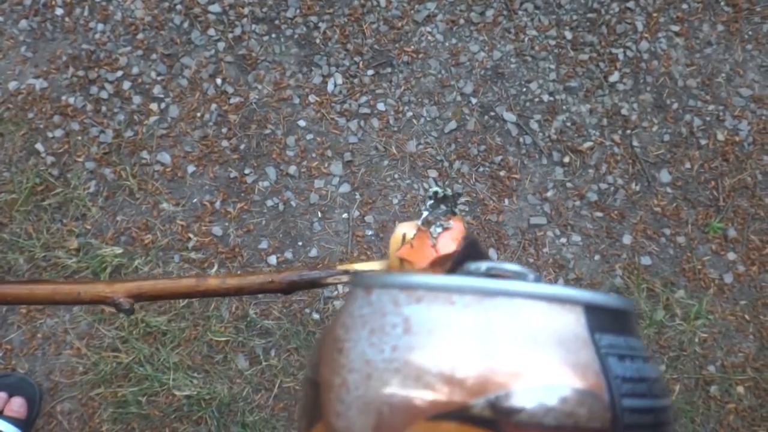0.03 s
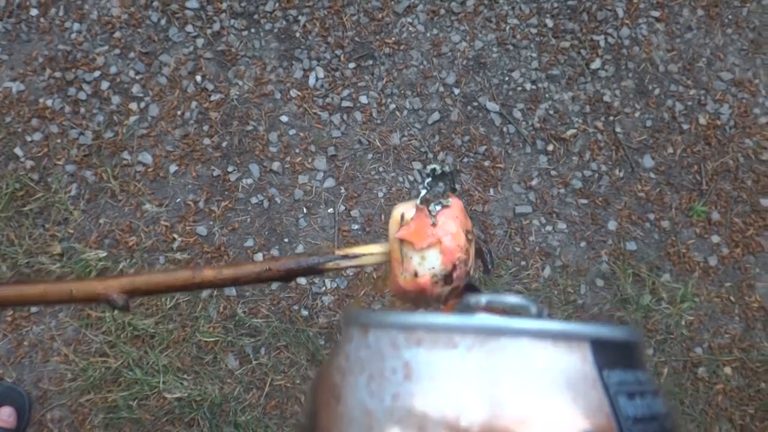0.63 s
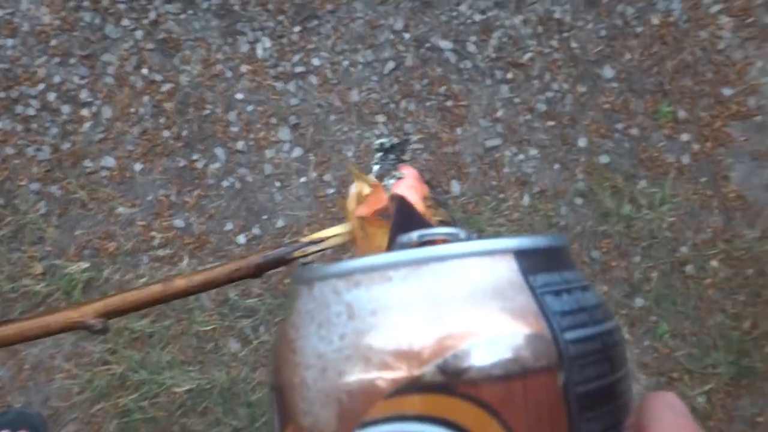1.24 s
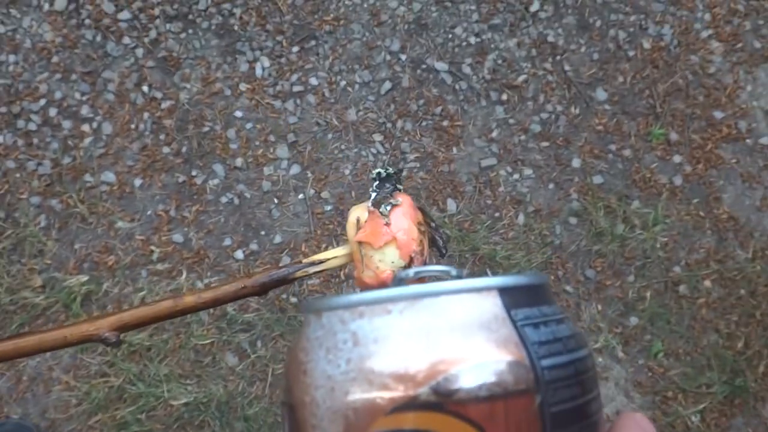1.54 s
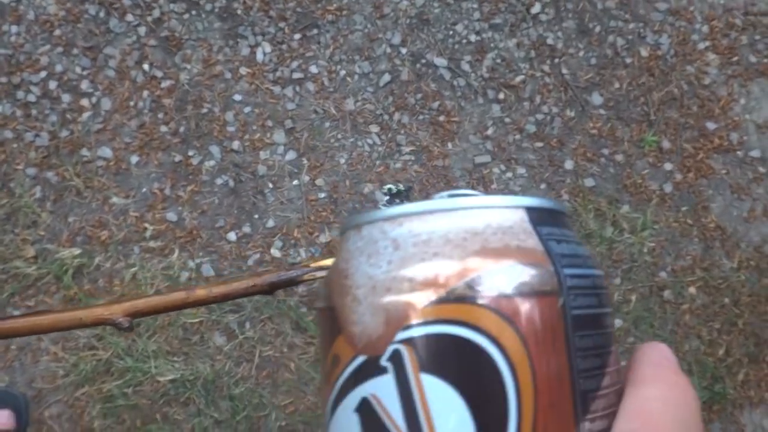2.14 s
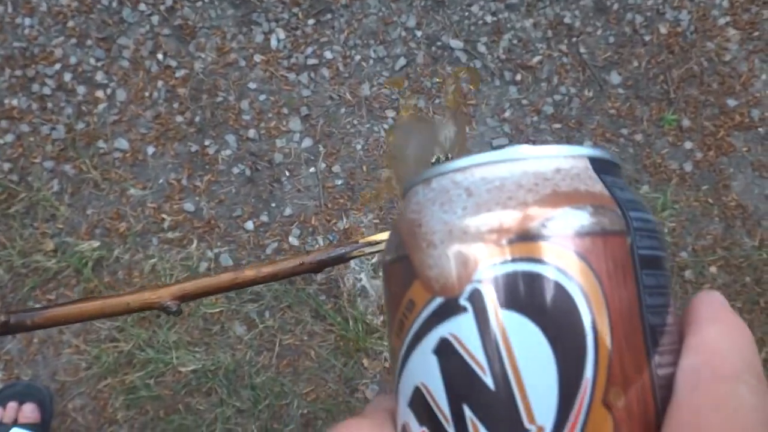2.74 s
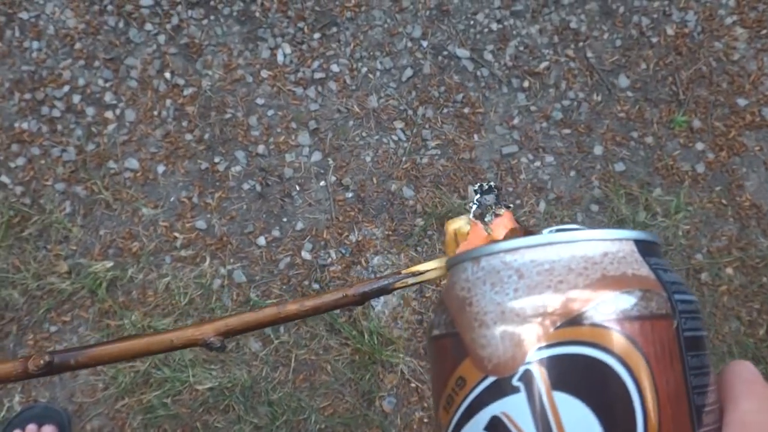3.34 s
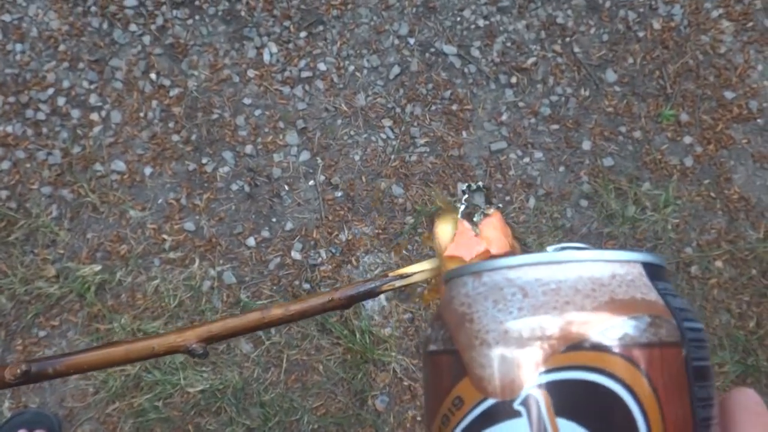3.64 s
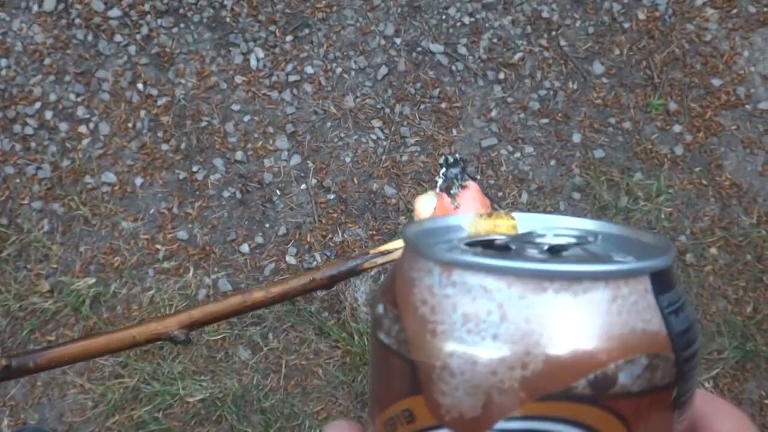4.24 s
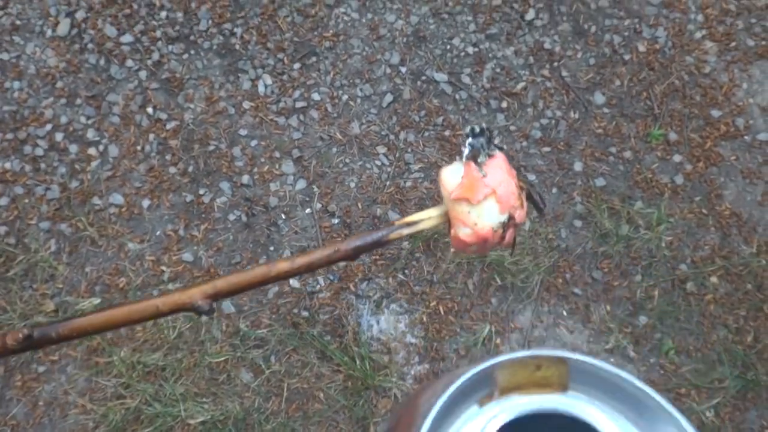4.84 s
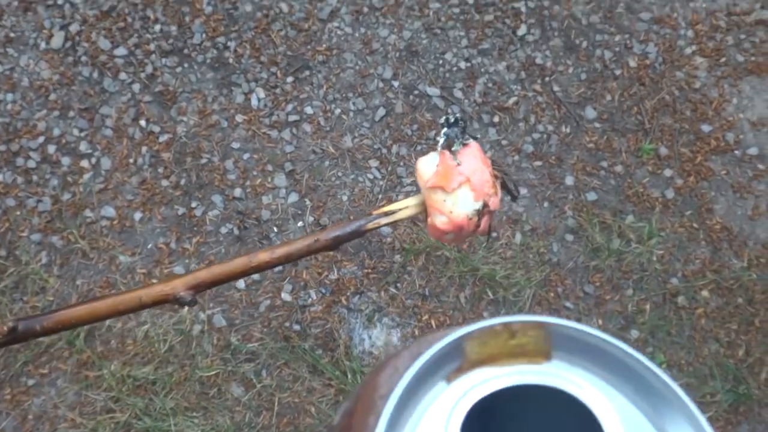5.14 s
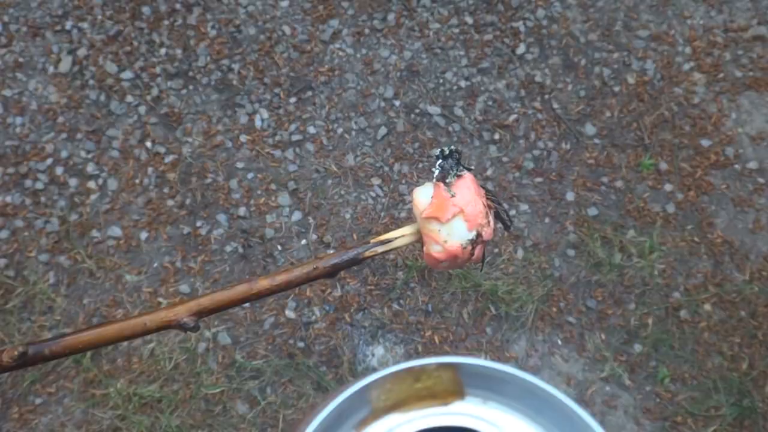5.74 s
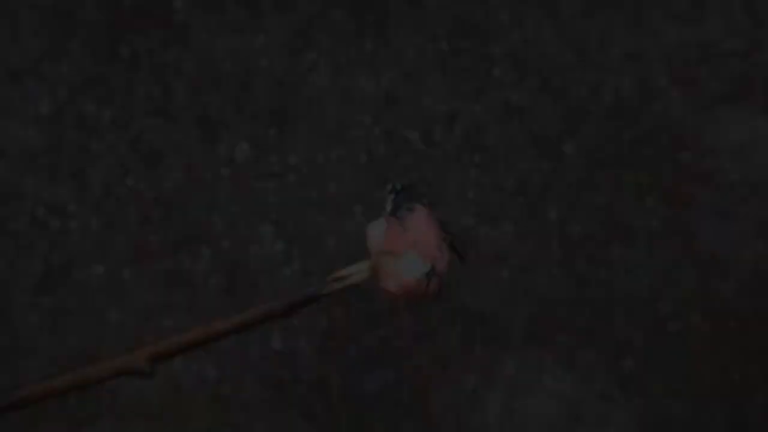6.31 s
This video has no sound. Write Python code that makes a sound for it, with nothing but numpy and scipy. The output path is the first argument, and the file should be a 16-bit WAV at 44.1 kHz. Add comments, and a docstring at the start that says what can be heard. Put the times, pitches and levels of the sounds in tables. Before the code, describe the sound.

Soda is tipped from a can over a stick in several short pours, and crisp drops spatter on gravel close to the microphone. The puddle fizzes finely while the can softly sloshes and glugs. Near the end its dented wall clicks sharply and fingers bump it. The drips stop and the fizz fades. A small bird and a distant animal call faintly over a quiet outdoor rumble.

```python
"""Crisp drops spatter on gravel as soda is tipped from a can over a stick in short pours.
Tiny bursting bubbles make the puddle fizz and slowly fade, over a quiet outdoor rumble and a low hum.
A small bird whistles and some animal cries far off. The soda sloshes as the can moves and glugs
as air gulps in. Near the end the can's dented wall clicks back and fingers bump against it."""
import sys
import numpy as np
from scipy import signal
from scipy.fft import rfft, irfft, next_fast_len
from scipy.io import wavfile
from scipy.ndimage import uniform_filter1d, map_coordinates

SR = 44100
rng = np.random.default_rng(int(sys.argv[2]) if len(sys.argv) > 2 else 0)


def wrap_up_sound(samples):
    """Save the sound to the file named by the first command line argument, as 16-bit audio."""
    columns = np.atleast_2d(samples).T
    # keep every value between -1 and 1, then stretch to whole-number steps
    tamed = np.clip(columns, -1, 1)
    steps = np.round(tamed * 32767).astype(np.int16)
    wavfile.write(sys.argv[1], SR, steps)


N = 289737


def amp(db):
    """Turn decibels into a multiplier."""
    return 10 ** (np.asarray(db) / 20)


def unit(x):
    """Scale a sound to an average (rms) level of 1."""
    return x / np.sqrt(np.mean(x ** 2) + 1e-20)


def along(points, hz):
    """Read between (f/Hz, value) points, with octaves evenly spaced."""
    f, v = np.transpose(points)
    return np.interp(np.log(hz + 1), np.log(f + 1), v)


def curve(rows):
    """Join (t/s, value) points into one value per sample."""
    return np.interp(np.arange(N) / SR, *np.transpose(rows))


def wobble(rate):
    """A smooth curve through `rate` random values a second."""
    return map_coordinates(rng.standard_normal(int(N * rate / SR) + 4), [np.arange(N) * rate / SR])


def filtered(x, response):
    """Multiply each frequency in x by response(hz)."""
    m = next_fast_len(N + SR // 2)
    return irfft(rfft(x, m) * response(np.fft.rfftfreq(m, 1 / SR)), m)[..., :N]


def ring(x, gain_db):
    """Shape the tone of x so that it rings only after a hit (a minimum-phase filter)."""
    cepstrum = irfft(gain_db * np.log(10) / 20)
    half = cepstrum.shape[-1] // 2
    fold = np.r_[1, np.full(half - 1, 2), 1, np.zeros(half - 1)]
    return irfft(rfft(x) * np.exp(rfft(cepstrum * fold)))


def add(track, s, sound):
    """Mix a sound into a track at s seconds."""
    start = max(round(s * SR), 0)
    part = track[..., start:start + sound.shape[-1]]
    part += sound[..., :part.shape[-1]]


def pops(rate, spread_db):
    """Tiny clicks of random size, about `rate` a second."""
    clicks = (rng.random(N) < rate / SR) * rng.standard_normal(N)
    return unit(clicks * amp(spread_db * np.clip(rng.standard_normal(N), -2, 2)))


def widen(mid, side):
    """Make left and right by adding and subtracting `side`."""
    return np.array([mid + side, mid - side])


def outdoor_echo(x, fade_s):
    """A blurred echo, different at each ear, that falls 60 dB in fade_s."""
    t = np.arange(SR) / SR
    tail = rng.standard_normal((2, SR)) * amp(-60 * t / fade_s)
    return signal.fftconvolve(np.atleast_2d(x), tail / np.linalg.norm(tail[0]), axes=1)[:, :N]


# each tip of the can: start t/s, end t/s, level/dB
POURS = [(0, 0.117, -35.5), (0.272, 0.475, -36), (0.633, 0.943, -34.5), (1.048, 1.436, -36.5),
         (1.665, 2.013, -35), (2.14, 2.421, -40), (3.073, 3.17, -36.5), (3.52, 4.222, -36),
         (4.69, 4.724, -38)]
def flow(s, rise_db_per_s=78, fall_db_per_s=75, dribble_db=-43, hold_s=0.23, fade_db_per_s=19):
    """The stream's level in dB at times s: it builds, holds and stops, and the wet stick dribbles on."""
    start, end, db = np.transpose(POURS)[:, :, None]
    early, late = np.maximum(start - s, 0), np.maximum(s - end, 0)
    dribble = dribble_db - fade_db_per_s * np.maximum(late - hold_s, 0)
    return (np.maximum(db - fall_db_per_s * late, dribble) - rise_db_per_s * early).max(0)


def shower(tries, over_flow_db, spread_db, bright, bright_spread, full_flow_db, thinning):
    """Pick random drops for splats(): many in a full stream, fewer and softer as it weakens."""
    delay, chance = rng.random((tries, 2)).T
    size, tone = np.clip(rng.standard_normal((tries, 2)), -2, 1.5).T
    s = (np.arange(tries) + 2 * delay) / (tries + 2) * N / SR
    flow_db = flow(s)
    falls = chance < amp(thinning * (flow_db - full_flow_db))
    db = flow_db + over_flow_db + spread_db * size
    return np.column_stack([s, db, bright + bright_spread * tone])[falls]


# the tone of the splats, as coloured by the microphone: f/Hz, level/dB
SPLAT_TONE = [(300, -29.5), (900, -32), (1700, -35.5), (2700, -25.5), (3500, -26.5), (4350, -16),
              (5600, -13), (7900, -2), (9000, 3), (10300, -9), (11800, -22.5), (13600, -8), (15500, -8.5),
              (16600, -47)]
def splats(rows, slap=4.6, ragged_s=0.00061, scatter_db=-9, patter_db=-22):
    """Each drop bursts on a stone with its own pitch, throws droplets about and gets one short echo."""
    size, lead_s = 2048, 0.002
    burst_s, scatter_s, patter_s = 0.00026, 0.0028, 0.0057  # fade times
    echo_s, echo_db = 0.0053, -16
    age, hz = np.arange(size) / SR - lead_s, np.fft.rfftfreq(size, 1 / SR)
    before, after = np.minimum(age, 0), np.maximum(age, 0)
    s, db, bright = np.transpose(rows)[:, :, None]
    length, wetness, path, pitch = np.clip(rng.standard_normal((len(rows), 4)), -1.5, 1.5).T[:, :, None]
    burst = np.exp(2 * before / burst_s - after / (burst_s * amp(3.8 * length)))
    force = burst * rng.standard_normal((len(rows), size))
    force[:, round(lead_s * SR)] += slap
    # a ragged drop starts to land a little before its bulk arrives
    onset = np.exp(before / (ragged_s * amp(4.2 * wetness)))
    droplets = amp(scatter_db) * np.exp(-after / scatter_s) + amp(patter_db) * np.exp(-after / patter_s)
    patter = onset * droplets * amp(2 * wetness) * rng.standard_normal((len(rows), size))
    octaves = np.log2(np.clip(hz, 500, 15000) / 8500)
    tilt = bright * octaves * np.exp(-(octaves / 2.4) ** 2)  # brightness tilts the treble
    air_pocket = 8 * np.exp(-((octaves - 0.53 * (pitch - 1)) / 0.14) ** 2)  # trapped air rings
    tone = along(SPLAT_TONE, hz)
    hits = ring(force, tone + tilt + air_pocket / 2) + ring(patter, tone + tilt / 2 + air_pocket)
    loudest = np.sqrt(uniform_filter1d(hits ** 2, size=88, axis=1).max(1, keepdims=True))
    hits *= amp(db) / loudest
    echo = amp(echo_db) * np.exp(-2j * np.pi * hz * echo_s * (1 + path / 10))
    hits = irfft(rfft(hits) * (1 + echo))
    out = np.zeros(N)
    for when, hit in zip(s[:, 0], hits):
        add(out, when - lead_s, hit)
    return out


# the heaviest drops: t/s, level/dB, brightness/(dB per octave)
HEAVY_DROPS = [(.0279, -19, 0), (.0535, -19.5, -9), (.0659, -18, 11), (.1262, -16, -7), (.3019, -21, -7),
               (.3344, -19.5, 11), (.3985, -17.5, 8), (.4527, -17.5, -9), (.5654, -18.5, -3),
               (.6675, -25.5, 7), (.7714, -22, -6), (.8956, -18, -4), (.9188, -17, 5), (1.0715, -27.5, -16),
               (1.1433, -15, -1), (1.1924, -19, 8), (1.2853, -20, -3), (1.3556, -19.5, 0),
               (1.4064, -16, 24), (1.6983, -18.5, 1), (1.7955, -19.5, -2), (1.8769, -17, 7),
               (1.9778, -15.5, 4), (2.0621, -22, -7), (2.3524, -20.5, 17), (2.3632, -19.5, 10),
               (2.3946, -22.5, 4), (2.41, -21.5, -3), (2.4826, -21, -1.5), (2.5266, -18.5, 5.5),
               (2.6343, -18, -7), (2.6686, -23, -6), (2.7508, -25, -4.5), (3.0661, -27.5, 14),
               (3.0821, -22, 33), (3.1829, -22, 4), (3.4584, -22, 7), (3.4724, -23.5, -1),
               (3.5149, -22, 0.5), (3.6221, -19, 14), (3.692, -20, 1), (3.7517, -19, -9.5),
               (3.7811, -16, 1), (3.8804, -20, -3.5), (3.967, -18, 2.5), (4.0255, -18.5, 2.5),
               (4.0662, -21, -4), (4.1024, -21, -6), (4.2049, -20, 10), (4.2091, -17, 8), (4.2433, -19, -1),
               (4.2723, -18.5, -2.5), (4.3388, -21.5, -11), (4.4007, -18.5, -0.5), (4.4102, -21, -3),
               (4.4394, -23.5, 0), (4.5981, -20, 0.5), (4.6442, -17.5, -2), (4.7012, -16.5, -8),
               (4.9183, -31, 11), (5.2177, -35, 1)]
def spatter(wander_db=0.52, echo_db=-20):
    """The stream lands as heavy drops, middling beads and fine spray, a little to either side."""
    beads = shower(tries=205, over_flow_db=11.5, spread_db=1.4, bright=1.5, bright_spread=5.4,
                   full_flow_db=-37.5, thinning=1.4)
    spray = shower(tries=1250, over_flow_db=0.5, spread_db=4.5, bright=-1.5, bright_spread=3.5,
                   full_flow_db=-35, thinning=1.1)
    heavy = splats(HEAVY_DROPS, slap=4.8, ragged_s=0.00048, scatter_db=-9.5, patter_db=-22.5)
    drops = heavy + splats(beads) + splats(spray)
    # each ear hears a slightly different tone
    width = [(1000, -3.5), (4000, -14.0), (9000, -16.5), (13000, -30)]  # f/Hz, level/dB
    side = filtered(drops, lambda hz: 1j * amp(along(width, hz)) * np.sin(2 * np.pi * hz * 0.000414))
    wander = amp(widen(0, wander_db * wobble(60)))
    return widen(drops, side) * wander + amp(echo_db) * outdoor_echo(drops, fade_s=0.068)


# the tone of the fizz, as coloured by the microphone: f/Hz, level/dB
FOAM_TONE = [(1500, -32.5), (3700, -22), (4400, -16.5), (5200, -16), (7400, -9), (8400, -6.5), (9250, 1),
             (10300, -17), (11900, -23.5), (14200, -15), (15600, -16), (16000, -61)]
def foam(side_db=-15):
    """Countless tiny bubbles burst in a fine hiss that slowly fades."""
    fade = [(0, -42.5), (2, -44), (2.9, -45), (4.2, -45.5), (5.5, -49.5), (6.55, -51)]  # t/s, level/dB
    bubbles = widen(pops(rate=24000, spread_db=3), amp(side_db) * rng.standard_normal(N))
    hiss = unit(filtered(bubbles, lambda hz: amp(along(FOAM_TONE, hz))))
    return amp(curve(fade) + wobble(23.195) / 2) * hiss


# the tone of the outdoor air: f/Hz, level/dB
AIR_TONE = [(15, -38), (25, -3), (118, 0.5), (164, -4.5), (210, -4), (360, -12.5), (1120, -10.5),
            (1440, -17), (1700, -25.5), (2180, -22), (3090, -12.5), (3500, -20), (4550, -107), (7700, -120)]
# how alike it is at both ears: f/Hz, likeness (1 = the same)
AIR_LIKENESS = [(60, 0.87), (130, 0.98), (260, 0.22), (800, 0.012), (3000, 0.52)]
def rumble(level_db=-59):
    """A distant, gently wavering rumble."""
    def mid_and_side(hz):
        angle = np.arccos(np.clip(along(AIR_LIKENESS, hz), -1, 1)) / 2
        return amp(along(AIR_TONE, hz)) * [np.cos(angle), np.sin(angle)]
    air = unit(widen(*filtered(rng.standard_normal((2, N)), mid_and_side)))
    return amp(level_db + wobble(2.2) / 2) * air


# the notes in the hum: f/Hz, relative level/dB
HUM_NOTES = [(59, -75.5), (79, -65), (120, -66), (203, -72)]
def hum(gain_db=-1):
    """Low, unsteady notes swell and fade together."""
    t = np.arange(N) / SR
    swell = [(0, -2), (.8, 2), (4.8, 1), (6.55, -5)]  # t/s, level/dB
    notes = sum(amp(db + 1.86 * wobble(6.5)) * np.sin(2 * np.pi * hz * t + 1.36 * wobble(9))
                for hz, db in HUM_NOTES)
    return amp(gain_db + curve(swell)) * np.sqrt(2) * notes


def calls(rows, warble_hz, depth, rough, arch):
    """Sliding whistled notes with a warble and a shaky pitch."""
    out = np.zeros(N)
    for s, length, start_hz, end_hz, db in rows:
        t = np.arange(int(length * SR)) / SR
        swell = np.abs(np.sin(np.pi * t / length))
        bend = depth * np.sin(2 * np.pi * warble_hz * t) + arch * (swell - .5)
        jitter = np.interp(t, np.linspace(0, 1, 300), rng.standard_normal(300))
        pitch = (start_hz + (end_hz - start_hz) * t / length) * (1 + bend + rough * jitter)
        add(out, s, amp(db) * unit(np.sqrt(swell) * np.sin(2 * np.pi * np.cumsum(pitch) / SR)))
    return out


# the bird's notes: t/s, length/s, start f/Hz, end f/Hz, relative level/dB
BIRD_NOTES = [(.13, 0.12, 3070, 2676, -55.5), (.6, 0.089, 2770, 2570, -59), (3.62, 0.1, 2800, 2410, -60),
              (4.24, 0.2, 2880, 2530, -56), (4.87, 0.11, 3093, 2800, -57.5), (5.34, 0.066, 2850, 2880, -59),
              (5.4, 0.19, 2600, 2510, -64), (5.79, 0.26, 2750, 2540, -66)]
def bird(direct_db=-6, echo_db=-1.5):
    """A small bird whistles short, mostly falling notes, blurred by the surroundings."""
    song = calls(BIRD_NOTES, warble_hz=33.1, depth=0.028, rough=0.037, arch=0.009)
    return amp(direct_db) * song + amp(echo_db) * outdoor_echo(song, fade_s=0.49)


# the animal's cries: t/s, length/s, start f/Hz, end f/Hz, relative level/dB
ANIMAL_CRIES = [(.22, 0.21, 970, 910, -61.5), (.26, 0.35, 1442, 1555, -58.5), (1.02, 0.3, 965, 902, -61.5),
                (1.8, 0.36, 956, 895, -59), (2.17, 0.27, 967, 976, -59.5), (2.2, 0.29, 1475, 1530, -67),
                (5.72, 0.253, 962, 918, -60)]
def far_animal(direct_db=-6, echo_db=-7):
    """Lower, drawn-out cries echo from far away."""
    cries = calls(ANIMAL_CRIES, warble_hz=45.1, depth=0.022, rough=0.0317, arch=0.0244)
    return amp(direct_db) * cries + amp(echo_db) * outdoor_echo(cries, fade_s=0.49)


# soda surging in the can: t/s, relative level/dB
SURGES = [(.3, -76), (.68, -58), (.94, -55.5), (1.46, -51), (1.75, -54), (2.4, -55.5), (3.02, -63),
          (3.5, -56.5), (3.95, -58.5), (4.27, -58), (4.49, -58.5)]
def slosh(gain_db=-1, rise_s=0.058, settle_s=0.33):
    """Whenever the can moves, the soda gurgles up quickly and then settles."""
    tone = [(90, -10), (200, 7.0), (330, -2), (470, -3), (900, -13), (2200, -8), (5000, -19.5),
            (8000, -56)]  # f/Hz, level/dB
    grains = widen(pops(rate=1500, spread_db=2), pops(rate=1500, spread_db=2) / 2)
    gurgle = unit(filtered(grains, lambda hz: amp(along(tone, hz))))
    t = np.arange(N) / SR
    surges = [amp(db) * np.exp(np.minimum((t - s) / rise_s, (s - t) / settle_s)) for s, db in SURGES]
    return np.max(surges, axis=0) * amp(gain_db + wobble(25)) * gurgle


# air gulping into the can: t/s, start f/Hz, level/dB
GULPS = [(1.44, 420, -58), (2.704, 316, -44.5), (3.011, 458, -57)]
def glugs(rise_per_s=5.0, swell_s=0.013):
    """Each gulp of air is a bubble ringing with a low, rising note."""
    t = np.arange(SR // 4) / SR
    swell = (t / swell_s * np.exp(1 - t / swell_s)) ** 2
    out = np.zeros(N)
    for s, hz, db in GULPS:
        add(out, s, amp(db) * swell * np.sin(2 * np.pi * hz * t * (1 + rise_per_s * t / 2)))
    return out


def air_puff(s=2.18, width_s=0.075, level_db=-54, below_hz=55):
    """One soft, low puff of air."""
    t = np.arange(N) / SR
    noise = unit(filtered(rng.standard_normal(N), lambda hz: 1 / (1 + (hz / below_hz) ** 4)))
    return amp(level_db) * noise * np.exp(-((t - s) / width_s) ** 2)


# how the can's thin wall rings: f/Hz, level/dB
CAN_TONE = [(500, -22), (1500, -9), (2200, 5.5), (2800, 3.5), (3250, -12), (4400, 1), (5000, -11),
            (8500, 3.5), (11500, -19), (15000, -17.5)]
def can_click(s=4.1545, peak_db=-8, buzz_db=-32, buzz_s=0.016, size=8192):
    """The dented wall springs back: a hard snap, then a short buzz that the hand damps."""
    t = np.arange(size) / SR
    force = (t == 0) + amp(buzz_db) * np.exp(-t / buzz_s) * rng.standard_normal(size)
    click = ring(force, along(CAN_TONE, np.fft.rfftfreq(size, 1 / SR)))
    out = np.zeros(N)
    add(out, s, amp(peak_db) * click / np.abs(click).max())
    return out


# the hand shifting on the can: t/s, peak level/dB
FINGER_BUMPS = [(4.275, -46.5), (4.439, -45), (4.49, -42), (4.6, -39), (6.365, -48)]
def knocks(fade_s=0.0057, size=4096):
    """Fingers bump the can with short, dull thuds."""
    tone = [(70, -6), (200, 1.5), (500, -8), (1200, -15.5), (4000, -29.5), (9000, -48)]  # f/Hz, level/dB
    t, hz = np.arange(size) / SR, np.fft.rfftfreq(size, 1 / SR)
    out = np.zeros(N)
    for s, db in FINGER_BUMPS:
        bump = ring(np.exp(-t / fade_s) * rng.standard_normal(size), along(tone, hz))
        add(out, s, amp(db) * bump / np.abs(bump).max())
    return out


def scene():
    """Mix the wet gravel, the surroundings and the can in stereo."""
    # f/Hz, level/dB added on the left and taken from the right
    balance = [(1000, 0.34), (4000, -0.32), (8500, -0.48), (13000, 0.00067)]
    gravel = filtered(spatter() + foam(), lambda hz: amp(widen(0, along(balance, hz))))
    surroundings = rumble() + hum() + bird() + far_animal() + air_puff()
    can = slosh() + glugs() + can_click() + knocks()
    return gravel + surroundings + can


def record(dry, top_hz=16800):
    """Cut off the very highest treble."""
    return filtered(dry, lambda hz: hz < top_hz)


dry = scene()
out = record(dry)
wrap_up_sound(out)
```